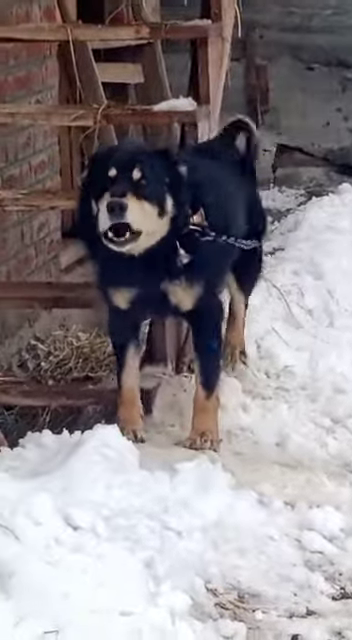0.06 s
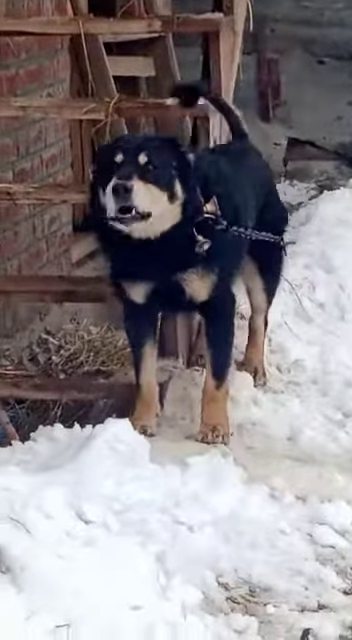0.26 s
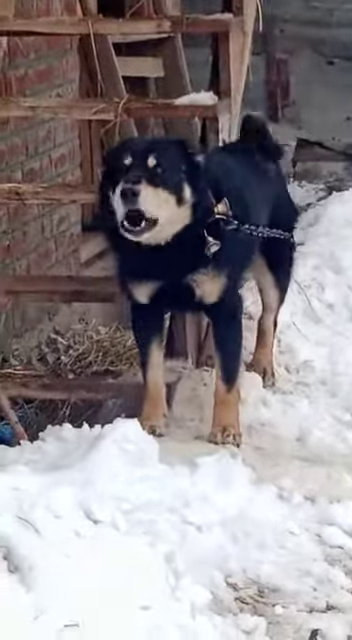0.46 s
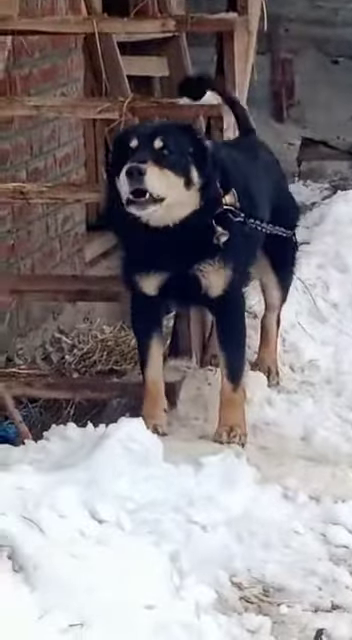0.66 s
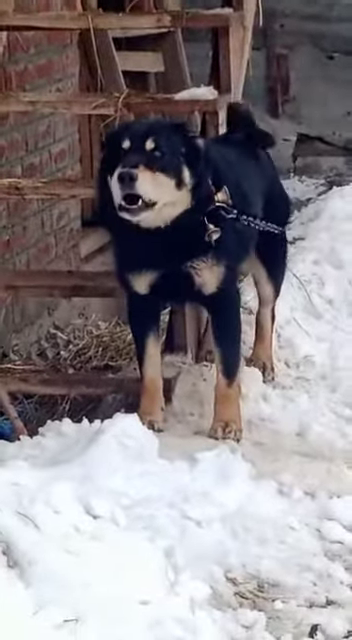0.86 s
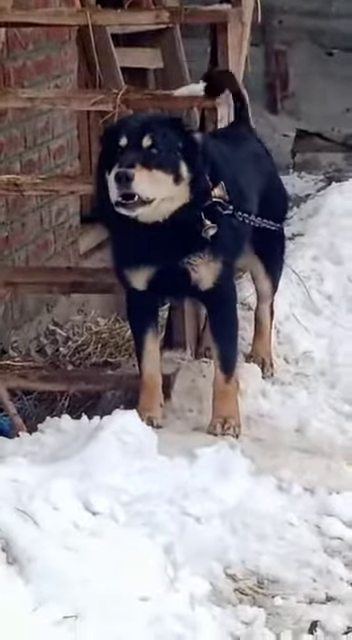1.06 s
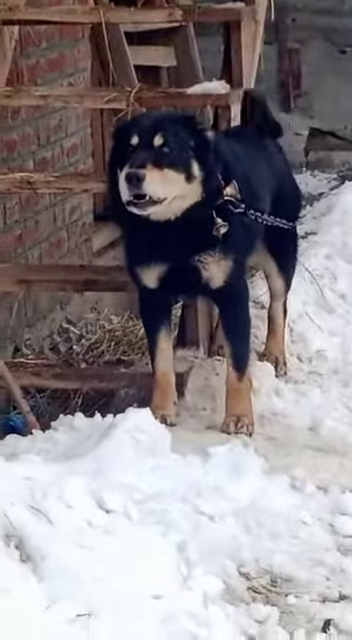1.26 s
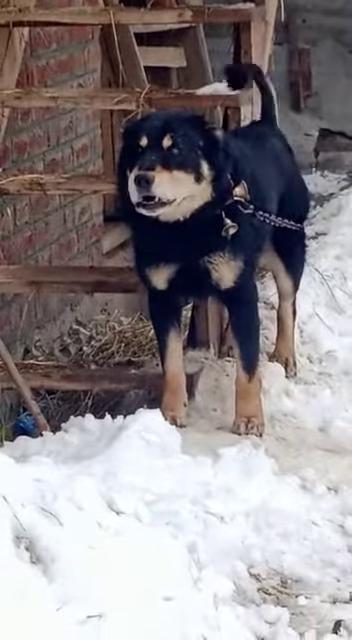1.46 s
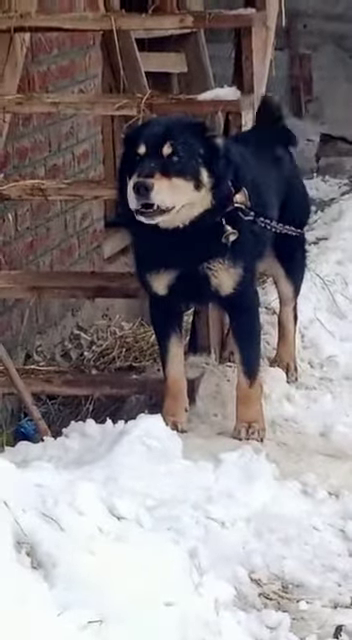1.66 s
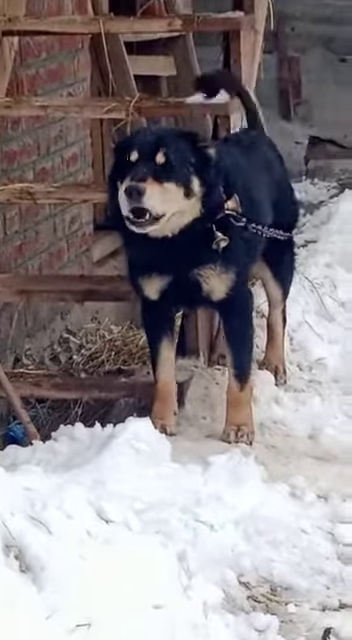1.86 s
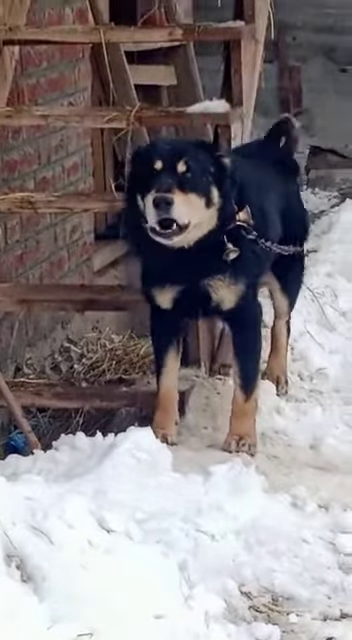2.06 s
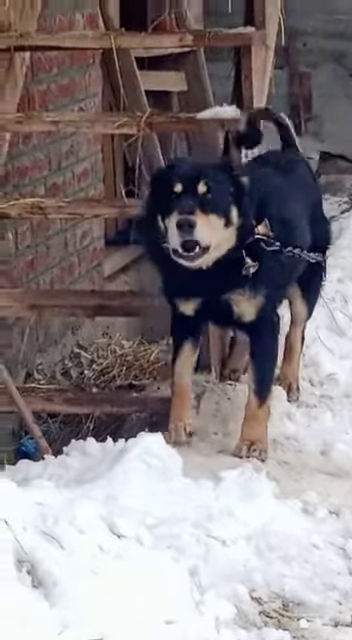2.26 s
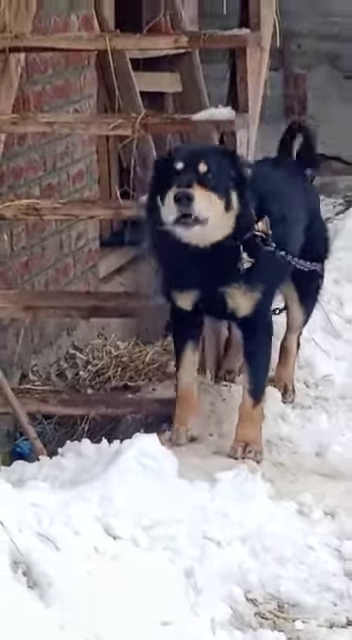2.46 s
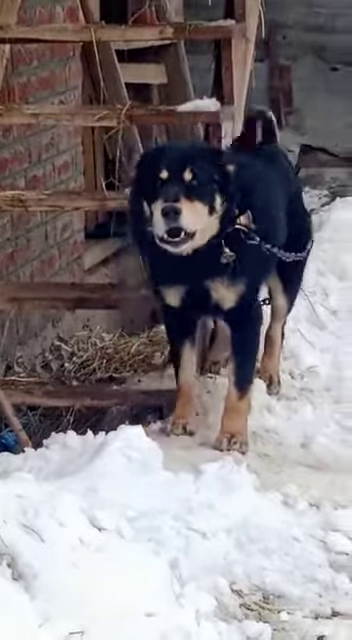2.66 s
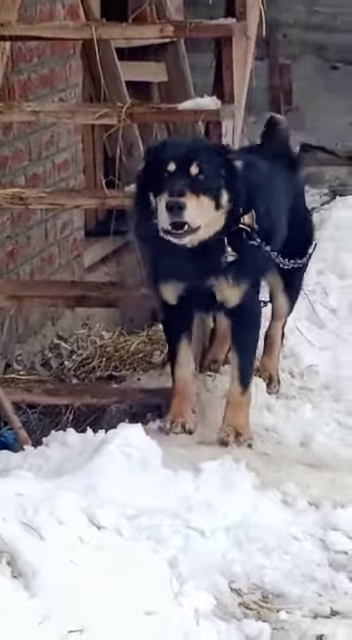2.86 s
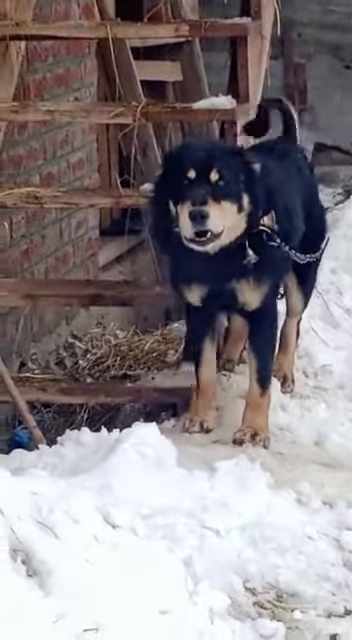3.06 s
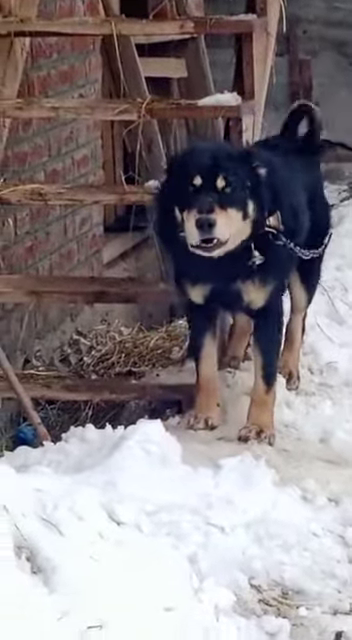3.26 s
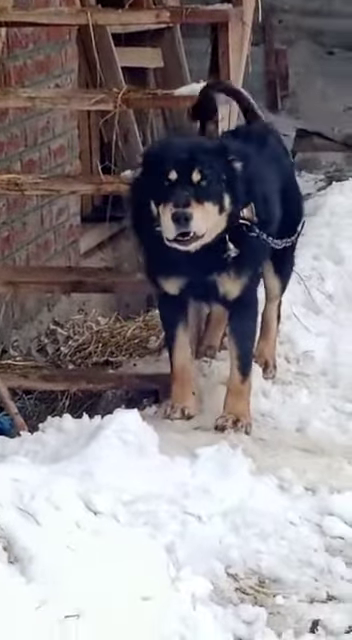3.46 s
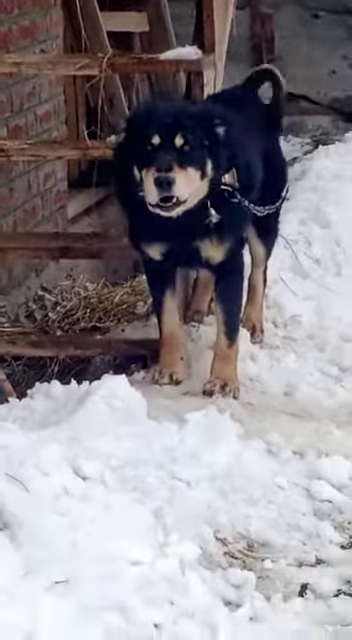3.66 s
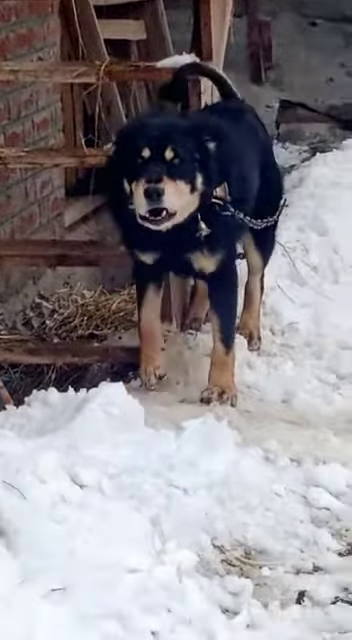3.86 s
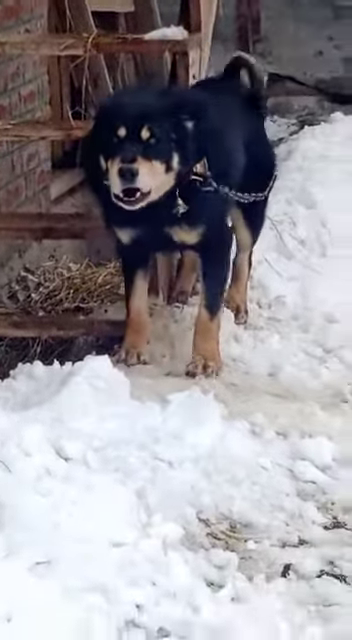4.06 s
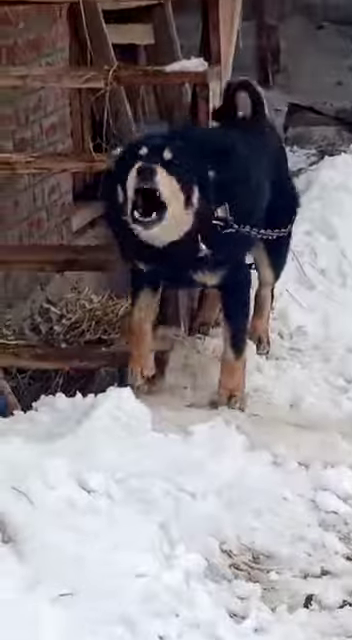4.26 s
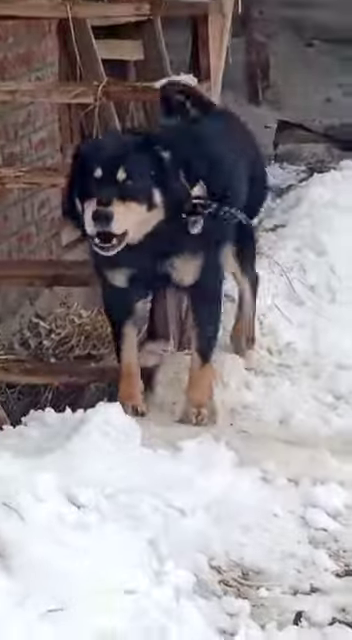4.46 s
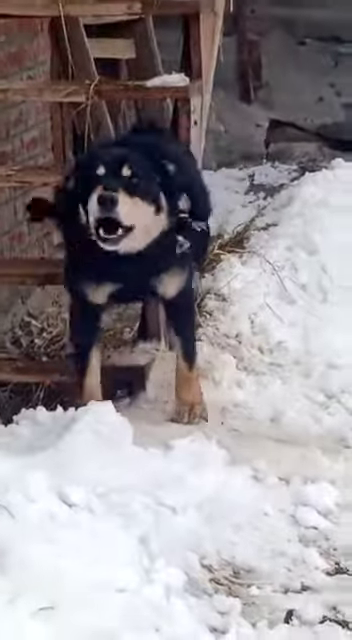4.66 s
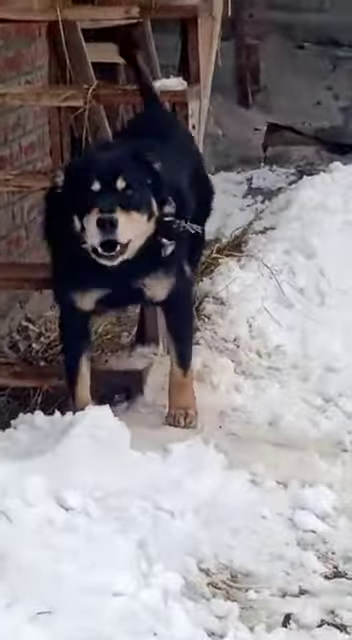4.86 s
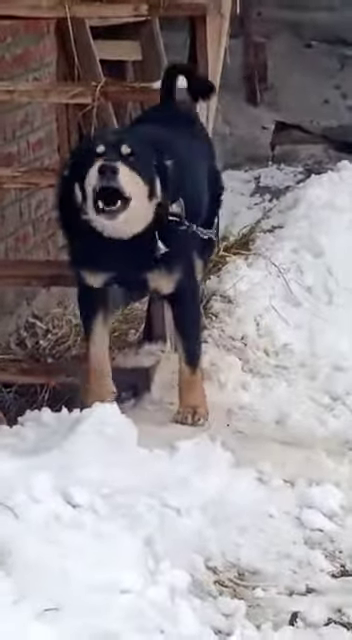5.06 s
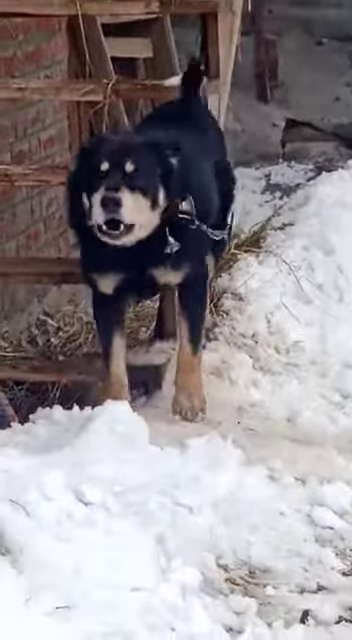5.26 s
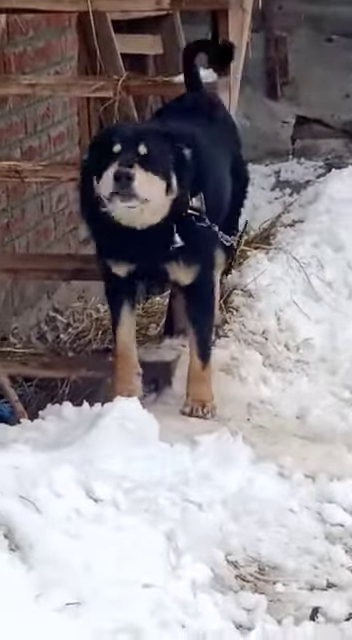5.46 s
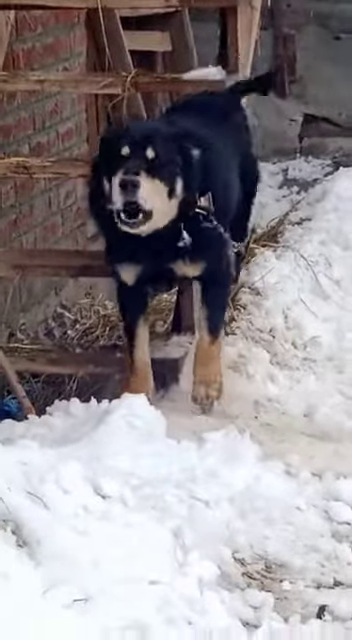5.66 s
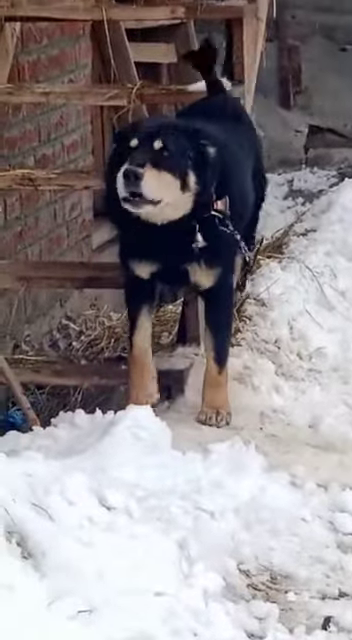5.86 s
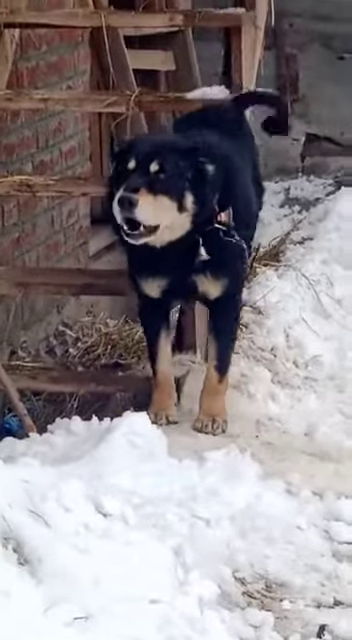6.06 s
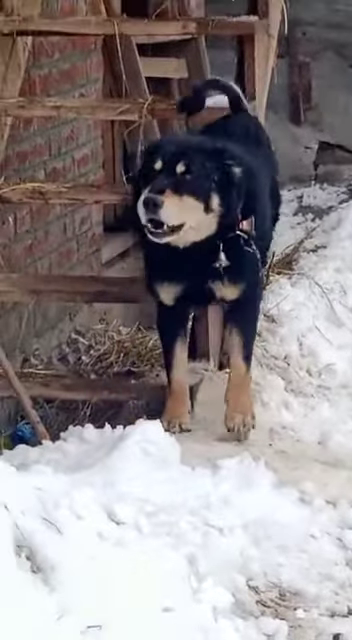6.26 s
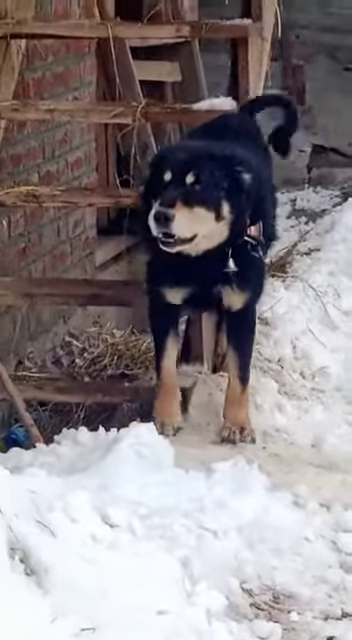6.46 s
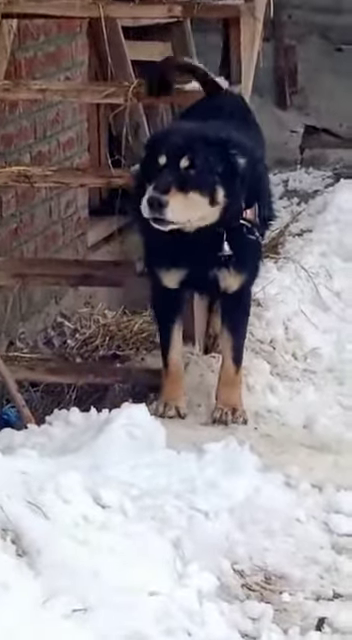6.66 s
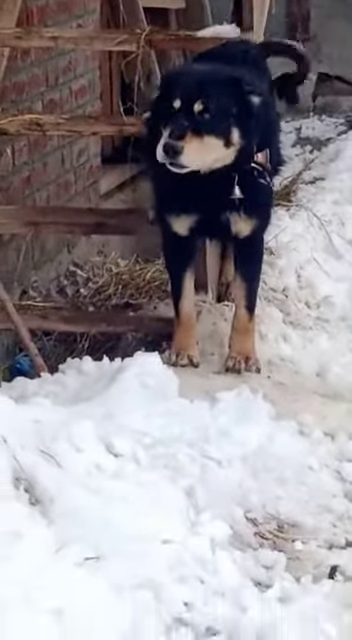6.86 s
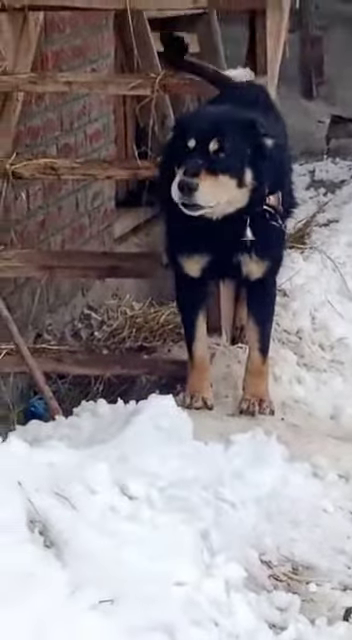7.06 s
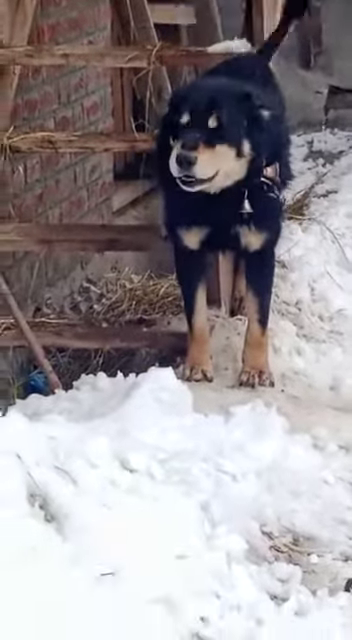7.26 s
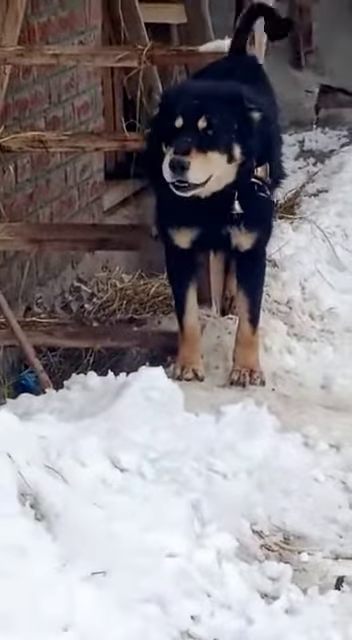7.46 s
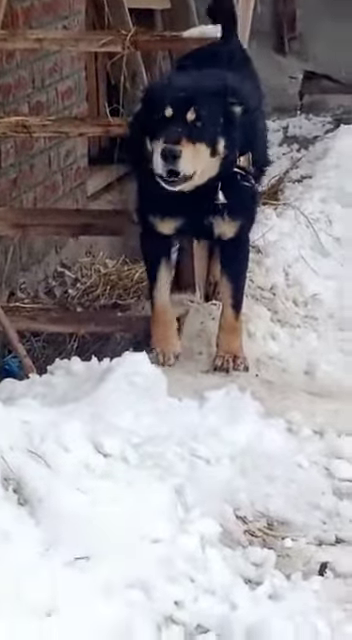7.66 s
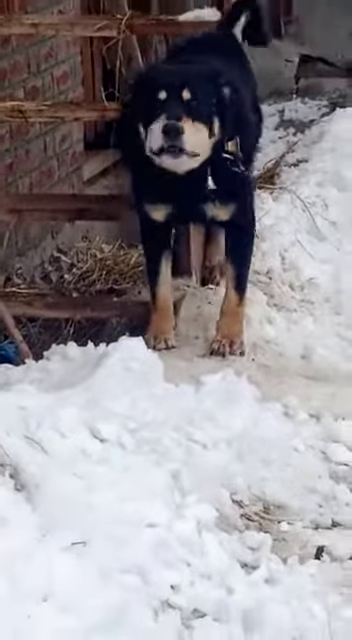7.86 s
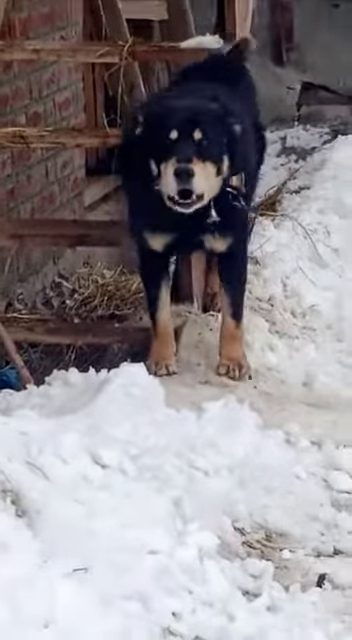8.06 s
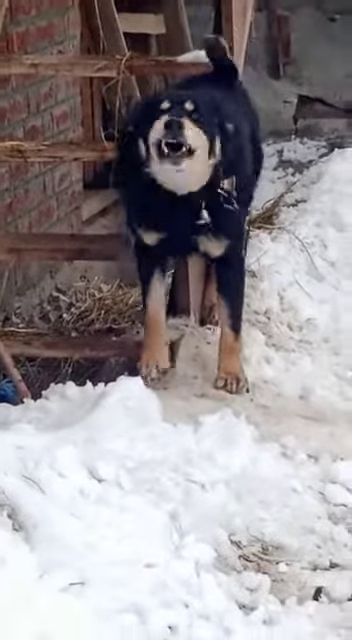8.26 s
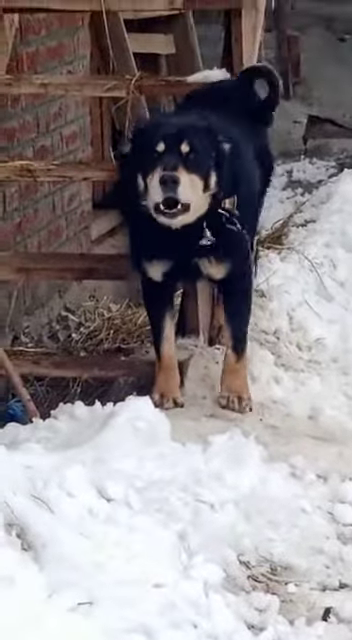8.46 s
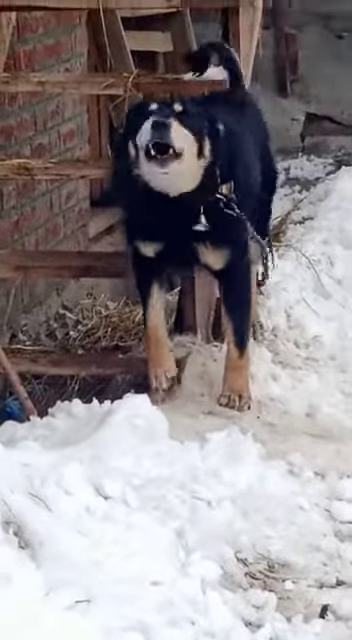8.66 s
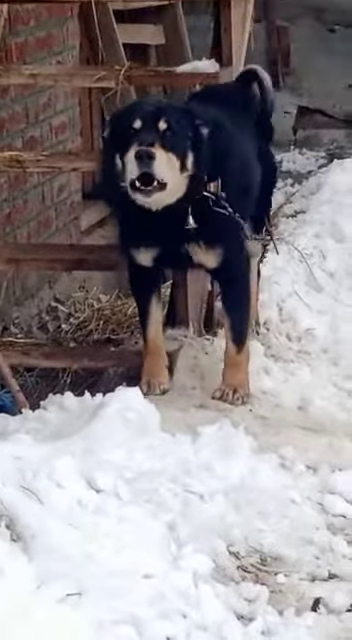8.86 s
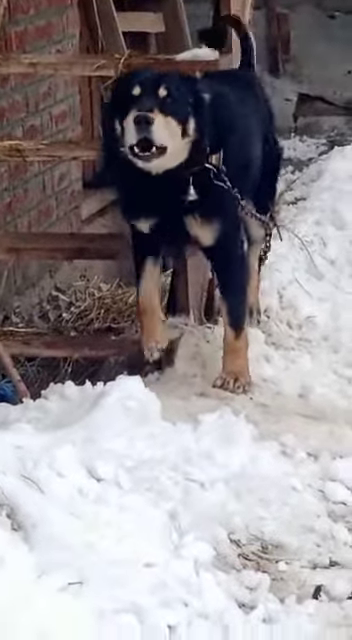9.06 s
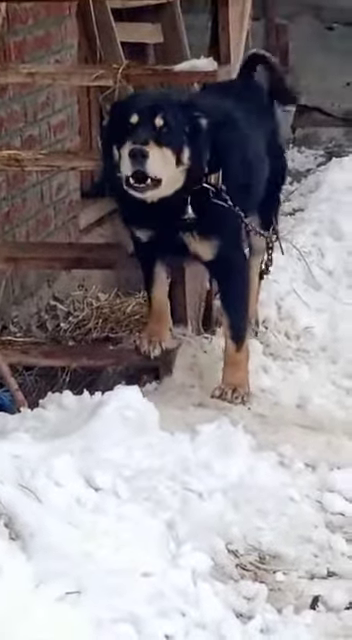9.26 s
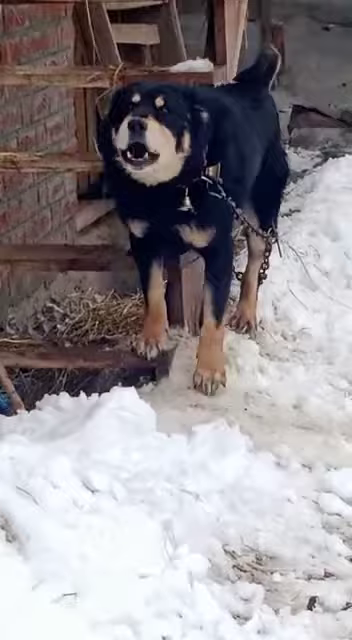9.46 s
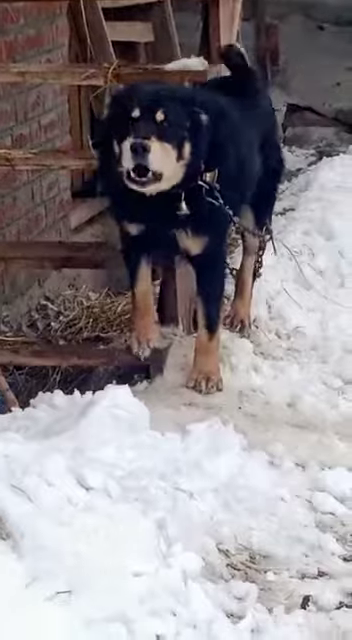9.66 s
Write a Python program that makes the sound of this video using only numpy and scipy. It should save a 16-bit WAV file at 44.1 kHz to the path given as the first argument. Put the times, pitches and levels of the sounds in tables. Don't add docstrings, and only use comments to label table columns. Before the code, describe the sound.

Hoarse, punchy close barks burst out in quick runs outdoors, with breathy panting, low growls, clear howling replies from another dog and jingling tags.

```python
import sys
import numpy as np
from scipy import signal
from scipy.fft import rfft, irfft
from scipy.io import wavfile
from scipy.ndimage import uniform_filter1d

SR = 44100
rng = np.random.default_rng(int(sys.argv[2]) if len(sys.argv) > 2 else 0)


def put_to_file(sound):
    columns = np.atleast_2d(sound).T
    safe = np.clip(columns, -1, 1)
    whole_steps = np.round(safe * 32767)
    wavfile.write(sys.argv[1], SR, whole_steps.astype(np.int16))


def amplitude_ratio(level_db):
    exponent = np.asarray(level_db, float) / 20
    return 10 ** exponent


N = 428651
TIME = np.arange(N) / SR


def rms_one(x):
    return x / np.sqrt(np.mean(x ** 2) + 1e-20)


def noise():
    return rng.standard_normal(N)


def drift(rate_hz):
    r = np.exp(-2 * np.pi * rate_hz / SR)
    return rms_one(signal.lfilter([1], [1, -2 * r, r * r], noise()))


def filtered(x, order, hz, kind):
    return signal.sosfilt(signal.butter(order, hz, kind, fs=SR, output="sos"), x)


def band_one(x, low_hz, high_hz):
    return x / np.std(filtered(x, 4, [low_hz, high_hz], "band"))


def turns(hz):
    return 2 * np.pi * np.cumsum(hz) / SR


def played(calls, extras=None):
    rows = []
    for k, call in enumerate(calls):
        extra = list(extras[k]) if extras else []
        rows += [list(row) + extra for row in call]
    s, *columns = np.transpose(rows)
    gate = 0
    for call in calls:
        inside_s = np.minimum(TIME - call[0][0], call[-1][0] - TIME)
        gate = gate + np.clip(inside_s / .012 + .5, 0, 1)
    return [np.interp(TIME, s, c) for c in columns] + [gate]


def resonate(x, hz, width_hz):
    r = np.exp(-np.pi * width_hz / SR)
    return signal.lfilter([(1 - r * r) / 2, 0, (r * r - 1) / 2], [1, -2 * r * np.cos(2 * np.pi * hz / SR), r * r], x)


def tract(x, modes, patchy_db):
    out = 0
    for k, (hz, width_hz, db) in enumerate(modes):
        flicker = amplitude_ratio(db + patchy_db * drift(13.4))
        out = out + (-1) ** k * flicker * resonate(resonate(x, hz, width_hz), hz, width_hz)
    return out


def swell(hz, centre_hz, width_hz, lift):
    return lift / (1 + ((hz - centre_hz) / width_hz) ** 2)


def struck(times, levels_db, modes, spread_db):
    out = np.zeros(N)
    luck = rng.standard_normal((len(times), len(modes)))
    for k, (hz, db, t60_s) in enumerate(modes):
        clicks = np.full(N, 1e-18)
        clicks[(times * SR).astype(int)] = amplitude_ratio(levels_db + db + spread_db * luck[:, k])
        r, w = amplitude_ratio(-60 / (t60_s * SR)), 2 * np.pi * hz / SR
        out += signal.lfilter([0, np.sin(w)], [1, -2 * r * np.cos(w), r * r], clicks)
    return out


# lag in seconds, share of the direct sound.
BOUNCES = [(.0013, .55), (.0029, -.5), (.0047, .3)]


def bounced(x):
    here = np.arange(N)
    out = x
    for lag_s, share in BOUNCES:
        lag = SR * lag_s * (1 + .03 * drift(2))
        out = out + share * np.interp(here - lag, here, x)
    return out


# frequency in Hz, level in dB.
AIR = [(24, -45), (60, -5), (200, -8), (585, -17), (942, -18), (1240, -14.5), (3140, -24.5), (12500, -35.5),
       (15300, -30)]


def air():
    hz = np.maximum(np.arange(N // 2 + 1) * SR / N, 1)
    points = np.array(AIR)
    colour = amplitude_ratio(np.interp(np.log(hz), np.log(points[:, 0]), points[:, 1]))
    return amplitude_ratio(-77 + 2.5 * drift(3)) * rms_one(irfft(rfft(noise()) * colour, N))


# start in seconds, end in seconds, mouth rush
# in dB, hiss at the teeth in dB.
BREATHS = [(-0.1, 0.086, -59.5, -67.5), (0.326, 0.482, -60, -69.5), (0.67, 0.853, -65, -74.5),
           (0.915, 1.29, -66, -71.5), (1.336, 1.616, -65.5, -74.5), (1.752, 1.882, -65.5, -77),
           (2.08, 2.302, -63.5, -75.5), (2.499, 2.776, -63, -75.5), (2.813, 2.906, -60.5, -69.5),
           (2.886, 3.004, -53.5, -68.5), (2.985, 3.062, -64, -84), (3.086, 3.296, -73.5, -84.5),
           (3.348, 3.775, -65, -81), (3.568, 3.801, -94, -94), (3.925, 4.203, -63, -72),
           (4.408, 4.577, -57.5, -69), (4.782, 4.961, -63, -58), (5.185, 5.334, -56.5, -70),
           (5.48, 5.691, -57, -72), (5.879, 6.2, -58.5, -70.5), (6.329, 6.415, -72.5, -83),
           (6.691, 6.942, -71, -82.5), (6.78, 6.795, -90, -84), (6.993, 7.027, -89, -77),
           (7.137, 7.298, -71.5, -86), (7.158, 7.545, -68.5, -91), (7.5, 7.696, -70, -84.5),
           (7.902, 8.153, -62.5, -74), (8.38, 8.554, -59.5, -71), (8.75, 8.916, -61, -73.5),
           (9.145, 9.349, -57, -73.5), (9.557, 9.731, -61.5, -74.5)]
# frequency in Hz, width in Hz, level in dB.
PANT_LOW = [(550, 194, -0.5), (1196, 244, 7.5), (1796, 347, 4), (2020, 1200, -8.5), (2475, 440, -10)]
# frequency in Hz, width in Hz, level in dB.
PANT_HIGH = [(3900, 1200, -19.5), (5110, 460, -3.5), (6200, 930, -5.5), (10540, 4000, -38),
             (15130, 2500, -18.5)]
# frequency in Hz, width in Hz, level in dB.
TEETH = [(3370, 270, 0.5), (4190, 220, -5)]


def panting(slaps, depth):
    lean = 1.08
    low, high = np.zeros(N), np.zeros(N)
    for start, end, low_db, high_db in BREATHS:
        span = (TIME > start) & (TIME < end)
        arch = np.sin(np.pi * ((TIME[span] - start) / (end - start)) ** lean) ** 0.68
        low[span] += amplitude_ratio(low_db) * arch
        high[span] += amplitude_ratio(high_db) * arch
    rush = band_one(bounced(tract(noise() * slaps, PANT_LOW, 3)), 1000, 2600)
    hiss = band_one(bounced(tract(noise() * slaps, PANT_HIGH, 3)), 4500, 7000)
    whistle = (1 - depth) ** 2 * tract(rms_one(hiss) + 3 * noise(), TEETH, 4)
    return low * rush + high * (hiss + whistle)


# time in seconds, then top, middle and low modes in dB.
TAGS = [(0.002, -72, -78, -66), (0.4444, -68, -74, -67), (4.337, -52, -68, -62), (4.4764, -56, -68, -59),
        (4.485, -47, -59, -62), (4.5161, -52, -63, -62), (4.5805, -54, -57, -59), (4.745, -72, -76, -64),
        (4.793, -74, -74, -70), (4.8459, -52, -64, -60), (4.9641, -58, -68, -71), (5.2779, -61, -68, -64),
        (5.49, -72, -74, -70), (5.695, -50, -65, -59), (5.9883, -59, -82, -61), (6.104, -64, -80, -91),
        (6.4502, -60, -68, -75), (6.465, -52, -62, -58), (7.7288, -60, -64, -59), (7.9219, -64, -71, -73),
        (7.9474, -67, -70, -70), (7.9778, -58, -71, -82), (8.094, -52, -69, -77), (8.1618, -55, -66, -71),
        (8.5061, -58, -61, -66), (8.586, -56, -68, -66), (8.75, -68, -70, -66), (8.8463, -68, -68, -72),
        (9.2, -74, -76, -76), (9.3636, -56, -65, -64), (9.5417, -67, -73, -63), (9.652, -66, -76, -78)]
# frequency in Hz, level in dB, t60 in seconds.
TAG_MODES = [
    [(15650, -2, .17), (14590, -7, .15), (14480, -13, .2)],
    [(10420, -3, .2), (10200, -8, .2), (9135, -5, .22)],
    [(7472, -3, .5), (7512, -6, .35)],
]
# time in seconds, then low, middle, top and long ring in dB.
LINKS = [(0.004, -64, -72, -69, -74), (0.3684, -72.5, -63, -69, -69), (1.042, -76, -74, -73.5, -63.5),
         (1.509, -57, -63, -66, -62), (5.185, -73, -79, -78, -79), (6.1365, -76.5, -74, -72, -66),
         (6.33, -73, -73, -87, -89), (6.487, -71.5, -64, -60.5, -69), (6.53, -61, -95, -100, -86),
         (6.759, -83, -84, -84.5, -80), (6.846, -78.5, -80.5, -75, -61.5), (7.15, -89, -81, -88, -77)]
# frequency in Hz, level in dB, t60 in seconds.
LINK_MODES = [
    [(2705, 0, .8)],
    [(5030, -2, .2), (4930, -5, .15)],
    [(8730, -1, .25), (12800, -7, .12)],
    [(5740, -1, .4), (5900, -9, .25)],
]
# time in seconds, level in dB, frequency in Hz, t60 in seconds.
PINGS = [
    (5.49, -64, 9140, 0.11),
    (5.68, -77, 13400, 0.085),
    (5.682, -77, 12850, .1),
    (5.865, -64, 9030, 0.14),
    (6.119, -82, 9050, .12),
    (6.14, -76, 13900, .1),
    (6.45, -59, 9090, .12),
    (6.468, -72, 2910, 0.54),
    (6.758, -80, 9100, 0.17),
    (7.095, -85, 9010, 0.1),
]


def metal():
    s, *groups_db = np.transpose(TAGS)
    tags = sum(struck(s, db - 2, modes, spread_db=2) for db, modes in zip(groups_db, TAG_MODES))
    tick_modes = [(5500, -4, .004), (9500, 0, .004), (12800, 2, .004)]
    tick = struck(s, groups_db[1] - 7, tick_modes, spread_db=2)
    s, *groups_db = np.transpose(LINKS)
    links = 0
    for db, modes in zip(groups_db, LINK_MODES):
        for mode in modes:
            ring = struck(s, db, [mode], spread_db=2)
            links = links + amplitude_ratio(2.9 * drift(25)) * resonate(ring, mode[0], 160)
    pings = sum(struck(np.array([s]), db, [(hz, 0, t60_s)], spread_db=0) for s, db, hz, t60_s in PINGS)
    return tags + tick + links + pings


PITCH_SAG = [.48, .28, .005, .01, .08, .46]
THROAT_GLIDE = [.93, .97, 1.05, 1.12]


def bark_shape(start, length, top_hz, arch, effort_db, burst_db, folds_db, throat_db, climax, hold, sink_db,
               folds_catch_db, throat_catch_db, burst, catch, climb):
    lead, surge, shut = 0.0536, 0.06224, 0.056
    fall_after = .11
    climax = np.clip(climax, catch + surge + .01, .7)
    hold = np.clip(hold, climax + .03, .95 - fall_after)
    fall = hold + fall_after
    main = [0, burst, catch, climax, hold, fall, 1]
    at = np.array([0, burst - lead, burst, catch, catch + surge, climax, hold, hold + shut, fall, 1])
    opening, closing = effort_db - 25.5, effort_db - 23
    folds = [opening, burst_db - 14, effort_db + folds_catch_db, folds_db, folds_db + 1.5, effort_db - 8.5, closing]
    held = throat_db + sink_db
    dropped = held - 10
    throat = [opening, burst_db - 5, burst_db, effort_db + throat_catch_db, throat_db - 3.5, throat_db, held,
              dropped, min(dropped, throat_db - 18), closing]
    rasp = effort_db + np.array([-25.5, -4.5, -0.5, 0, 0, -4.5, -25])
    sag = arch * np.interp(at, main, PITCH_SAG[:2] + [climb] + PITCH_SAG[2:])
    unsettled = .35 * sag
    glide = 1 + arch * (np.array(THROAT_GLIDE + [1] * 6) - 1)
    loose = 1 - arch * (1 - .3) * (at <= burst)
    return np.transpose([start + length * at, top_hz * (1 - sag), np.interp(at, main, folds), throat,
                         np.interp(at, main, rasp), unsettled, glide, loose])


# level in dB, share of the mouth opening from 0 to 1.
PARTIALS = [(-3.5, 0.6), (5, 0.17), (-1, 0.5), (-15.5, 0.8), (-40, 0.73), (-31.5, 0.98), (-19.5, 0.4)]


def fold_buzz(hz, phase, rough, throat_hz, mouth_db):
    folds = 0
    for k, (db, share) in enumerate(PARTIALS):
        partial_hz = (k + 1) * hz
        throat_gain = (1 + swell(partial_hz, throat_hz, 46, lift=2.1)) * np.minimum(partial_hz / 380, 1) ** 2
        folds = folds + amplitude_ratio(db + share * mouth_db) * throat_gain * np.cos((k + 1) * phase)
    shimmer = 1 + 1.74 * rough * drift(120)
    return shimmer * folds


def throat_tone(throat_hz, throat_rough, octave_db):
    swing = turns(throat_hz * (1 + 0.0126 * drift(27.7)))
    wobble = (drift(69) * np.cos(swing) + drift(82) * np.sin(swing)) / np.sqrt(2)
    octave = amplitude_ratio(octave_db + 3.0 * drift(60)) * np.cos(2 * swing)
    clear = np.cos(swing) + octave
    return np.sqrt(1 - throat_rough) * clear + np.sqrt(throat_rough) * wobble


# frequency in Hz, width in Hz, level in dB.
MOUTH = [(700, 53, 11), (1125, 379, 15), (1607, 500, -3), (1900, 990, 4.5), (2800, 250, -6.5),
         (4170, 930, 0.5), (5695, 870, 3), (6530, 1100, -3), (7084, 830, -7.5), (9100, 1700, -16),
         (11170, 1500, -23), (15200, 2500, -13.5)]


def bark_rasp(phase, rough, low_db, top_db):
    puffs = noise() * (1 + .5 * np.cos(phase)) * amplitude_ratio(drift(40))
    snaps = np.diff(np.floor(phase / (2 * np.pi)), prepend=0) * (1 - rough)
    puffs = puffs + 5.0 * filtered(snaps, 2 * 2, 1700, "high")
    rasp = band_one(bounced(tract(puffs, MOUTH, 3)), 1800, 8000)
    low = signal.sosfiltfilt(signal.butter(2, 1700, fs=SR, output="sos"), rasp)
    top = signal.sosfiltfilt(signal.butter(2, 7600, "high", fs=SR, output="sos"), rasp)
    return rasp + (amplitude_ratio(low_db) - 1) * low + (amplitude_ratio(top_db + 2.0 * drift(33)) - 1) * top


# start in seconds, length in seconds, top pitch in Hz, pitch arch from 0 to 1,
# effort as rasp level in dB.
BARKS = [(0.085, 0.2, 413.8, 0.95, -37.5), (0.489, 0.19, 399, 1, -38), (1.89, 0.15, 250.2, 0.92, -46.5),
         (2.328, 0.19, 391.1, 0.93, -39), (3.66, 0.26, 281.1, 0.06, -55), (4.217, 0.18, 403.1, 1, -37.5),
         (4.571, 0.17, 383.1, 0.99, -37.5), (4.981, 0.17, 394.5, 0.98, -37), (5.342, 0.2, 366.4, 1, -38.5),
         (5.693, 0.18, 350.5, 0.92, -37), (7.717, .18, 351, 0.95, -42), (8.173, 0.19, 387.1, 0.99, -40.5),
         (8.569, .18, 385.3, 0.96, -36.5), (8.918, 0.18, 372.9, 1, -40), (9.351, 0.18, 389.8, 0.94, -39.5)]
# first burst in dB, folds at the climax in dB, throat tone at the climax in dB.
STRESS = [(-30, -27.5, -29), (-32, -35.5, -39.5), (-35, -71, -33.5), (-32, -33, -32), (-56, -57, -43.5),
          (-33, -31, -25.5), (-39, -37.5, -29), (-24, -35, -21), (-25, -31.5, -20), (-26.5, -56, -18),
          (-32.5, -50.5, -20.5), (-27.5, -30.5, -25), (-25, -28, -18.5), (-25, -31.5, -33.5),
          (-28, -28.5, -33)]
# climax and hold end as shares of length, throat sink through the hold in dB.
PACE = [(0.52, .68, -8), (0.475, 0.68, 0.5), (0.45, .66, -18.5), (0.5, .66, -6.5), (0.49, 0.8, 6),
        (0.52, 0.6, -2.5), (0.5, .68, 2), (0.55, 0.67, 2), (.54, 0.62, 0), (0.55, .68, -7), (.55, .67, 3.5),
        (0.5, .6, -3.5), (0.52, .58, -8.5), (0.507, 0.659, -2.5), (0.49, 0.67, -10)]
# folds in dB, throat tone in dB.
CATCHES = [(-4.5, 9), (-1.5, 1), (-5, 12.5), (4.5, -9), (-13, 5), (0, -7), (1.5, 0), (1, 0.5), (2, 4.5),
           (4.5, -2), (5.5, 4), (-0.5, 4), (1, -6), (7.5, -7), (3, 7)]
LAUNCH = [(.23, .36, .12), (.23, .32, .14), (.3, .39, .1), (.21, .4, .06), (.32, .43, 0.11), (.17, .4, .06),
          (.2, .36, .08), (.21, .34, .04), (.21, .42, .01), (0.19, 0.4, .04), (.2, .33, .08),
          (.19, .31, .1), (.2, .4, .06), (.22, .33, .11), (.22, .37, .12)]
# throat tone in Hz, mouth opening on the upper partials in dB.
SHAPES = [(562.6, 4), (535, 7), (542.6, -5), (579.3, 7), (575, -36), (513.3, 7.5), (539.8, -18),
          (525, -2.5), (530, -1), (522.3, -12), (518.8, -2), (541, 5), (520, -2), (560, -4.5), (557, -1.5)]
ROUGH = [(.9, .1), (.9, .12), (.6, .5), (.85, .1), (.55, 1), (.15, .2), (.7, .4), (.12, .2), (.2, .25),
         (.1, .3), (.08, .45), (.15, .12), (.15, .2), (.8, .15), (.9, .15)]
# below the second resonance in dB, above the teeth in dB.
RASP_TILT = [(-5.5, 0.5), (-3.5, 0), (5.5, -3), (1, -3), (3.5, 4.5), (-3, -2), (-3.5, 3), (-3, 2.5),
             (2.5, 0.5), (-2.5, -5), (5, 0.5), (7, 2), (-3.5, -0.5), (-0.5, -3), (0.5, 0)]
THROAT_OCTAVE_DB = [-17.5, -10.5, -12, -20, -20, -17, -16, -22, -25, -15, -17.5, -15, -18.5, -10, -11]


def near_dog():
    barks = [bark_shape(*sum(rows, ())) for rows in zip(BARKS, STRESS, PACE, CATCHES, LAUNCH)]
    extras = [shape + rough + tilt + (octave_db,)
              for shape, rough, tilt, octave_db in zip(SHAPES, ROUGH, RASP_TILT, THROAT_OCTAVE_DB)]
    (hz, folds_db, throat_db, rasp_db, unsettled, glide, loose,
     throat_hz, mouth_db, throat_rough, rough, low_db, top_db, octave_db, gate) = played(barks, extras)
    rough = np.minimum(rough + unsettled, 1)
    hz = uniform_filter1d(hz, size=500)
    phase = turns(hz * (1 + .05 * rough * drift(72.6)))
    folds = fold_buzz(hz, phase, rough, throat_hz, mouth_db)
    throat = throat_tone(throat_hz * glide, throat_rough * loose, octave_db)
    rasp = bark_rasp(phase, rough, low_db, top_db)
    voice = np.sqrt(2) * (amplitude_ratio(folds_db - 4.5) * folds + amplitude_ratio(throat_db + 1.0) * throat)
    voice = filtered(gate * voice + 1e-18, 2, 250, "high")
    chest = rms_one(filtered(noise(), 2, [70, 190], "band"))
    return voice + gate * amplitude_ratio(rasp_db) * (rasp + amplitude_ratio(-29) * chest)


def growl_shape(start, length, start_hz, top_hz, level_db):
    return [(start, start_hz, level_db - 9.5), (start + 0.62 * length, top_hz, level_db),
            (start + length, top_hz * (1 - 0.079), level_db - 9)]


# start in seconds, length in seconds, start pitch in Hz, top pitch in Hz, level in dB.
GROWLS = [
    (0.458, .3, 98, 90.4, -71.5),
    (0.93, 0.69, 74, 88.2, -66.5),
    (1.902, 0.11, 104.5, 120.3, -66.5),
    (2.352, 0.48, 92.47, 85, -77),
    (2.835, .13, 94.9, 90.9, -69),
    (3.163, 0.12, 72.24, 70.4, -83.5),
    (3.333, 0.59, 78.23, 111.3, -65),
    (4.454, .5, 102.2, 98.3, -74),
    (6.837, 0.45, 94.2, 88.9, -77.5),
    (8.72, 0.46, 87.8, 93.04, -75),
]
GROWL_DB = [2.5, -1.5, -4.5, -18.5, -11.5, -17, -14.5]
GROWL_OCTAVE_DB = [2.5, -5, 10, -8, 2, 0, 1, 0.5, -3, -3.5]
GROWL_RATTLE_DB = [-6, 5.5, -11, -14, 7, -15.5, 2.5, -14, -3.5, -1]
# frequency in Hz, width in Hz, level in dB.
RATTLE = [(580, 150, 2.5), (840, 170, 0.5), (1250, 220, -3), (1760, 250, -7), (2260, 220, -3.5),
          (5700, 800, -17)]


def growl():
    growls = [growl_shape(*row) for row in GROWLS]
    hz, level_db, octave_db, rattle_db, gate = played(growls, list(zip(GROWL_OCTAVE_DB, GROWL_RATTLE_DB)))
    phase = turns(hz * (1 + 0.011 * drift(23)))
    hum = 0
    for k, db in enumerate(GROWL_DB):
        partial_db = db + (k == 1) * octave_db + 2 * drift(28)
        hum = hum - amplitude_ratio(partial_db) * np.cos((k + 1) * phase)
    cycle = phase / (2 * np.pi) % 1
    puff = np.exp(-5 * cycle) * amplitude_ratio(2.5 * drift(50))
    rattle = rms_one(tract(noise() * puff, RATTLE, 2))
    voice = gate * amplitude_ratio(level_db) * (np.sqrt(2) * hum + amplitude_ratio(rattle_db) * rattle)
    depth = gate * np.clip((level_db + 84) / 16, 0, .8)
    slaps = 1 - depth + 3 * depth * puff
    return voice, slaps, depth


# share of top pitch, level in dB, overtones in dB, third partial in dB.
ANSWER_ARCH = [
    (0.34, -20.5, -25, -12),
    (.72, -17, -1.5, -10),
    (.97, -2.5, -2.5, 11.5),
    (1.01, 1, 3.5, -7),
    (1.0, -2, -6, -14),
    (0.92, -13, -1.5, -3.5),
    (0.4, -31.5, -16, -10),
]


def answer_shape(start, length, top_hz, level_db, crest, crest_end, over_db, third_db, rasp_db):
    fall = crest_end + 0.41 * (1 - crest_end)
    moments = [0, 0.64 * crest, crest, (crest + crest_end) / 2, crest_end, fall, 1]
    return [(start + length * at, top_hz * share, level_db + db, level_db + over_db + o_db, third_db + t_db,
             rasp_db + 0.3 * db, abs(1 - share))
            for at, (share, db, o_db, t_db) in zip(moments, ANSWER_ARCH)]


# start in seconds, length in seconds, top pitch in Hz, level in dB.
ANSWERS = [
    (0.743, 0.23, 484.3, -33.5),
    (1.202, 0.18, 485.7, -31),
    (1.59, .19, 500, -30.5),
    (4.867, .22, 454.3, -36.5),
    (5.771, .19, 502, -29.5),
    (6.156, 0.18, 500, -29.5),
    (6.525, 0.18, 488, -31.5),
]
# crest begin and end as shares of length, overtones in dB, third partial in dB,
# rasp in dB.
ANSWER_COLOUR = [(0.33, 0.65, -21.5, 2, -55), (.32, .7, -19, -1.5, -51.5), (.36, .68, -20, -3, -53),
                 (.36, 0.93, -22, -9.5, -53), (0.28, .76, -17, -2.5, -47.5), (.32, .74, -19.5, 0.5, -47),
                 (.32, .66, -20.5, -3, -52)]
# frequency in Hz, width in Hz, level in dB.
ANSWER_MOUTH = [(540, 100, 9), (890, 160, -1.5), (1290, 120, -7), (2000, 150, -23), (2480, 110, -13.5),
                (2740, 120, -17)]
# frequency in Hz, width in Hz, level in dB.
ANSWER_RASP = [(500, 980, 0), (940, 1430, -7), (1520, 3000, -16.5), (2760, 320, -10.5), (5300, 1000, -14.5)]


def far_dog():
    answers = [answer_shape(*row, *colour) for row, colour in zip(ANSWERS, ANSWER_COLOUR)]
    hz, first_db, over_db, third_db, rasp_db, sag, gate = played(answers)
    hz = uniform_filter1d(hz, size=400)
    phase = turns(hz * (1 + 0.012 * drift(42) + .2 * sag * drift(70)))
    first = amplitude_ratio(first_db + 1.0 * drift(57)) * np.minimum(hz / 400, 1) * np.cos(phase)
    upper = swell(3 * hz, 1470, 40, lift=1.14) * amplitude_ratio(third_db + 2.6 * drift(25)) * np.cos(3 * phase)
    for k in range(2, 7):
        mouth = sum(swell(k * hz, centre_hz, width_hz, amplitude_ratio(db)) for centre_hz, width_hz, db in ANSWER_MOUTH)
        upper = upper + mouth * amplitude_ratio(4 * drift(45)) * np.cos(k * phase)
    puffs = noise() * (1 + 0.62 * np.cos(phase))
    rasp = amplitude_ratio(rasp_db) * rms_one(tract(puffs, ANSWER_RASP, 3))
    rasp = filtered(rasp, 6, 6800, "low")
    return gate * (np.sqrt(2) * (first + amplitude_ratio(over_db) * upper) + rasp)


# time in seconds, level in dB.
THUMPS = [(3.25, -83.5), (5.063, -63), (5.177, -49), (5.25, -49), (5.624, -53), (5.659, -67), (5.904, -41),
          (5.944, -53), (6.08, -49), (6.704, -45), (6.76, -49), (7.015, -52), (7.041, -64), (7.156, -57),
          (7.181, -56), (7.358, -55), (7.555, -61)]


def thumps():
    s, db = np.transpose(THUMPS)
    blows = struck(s, db - 5, [(150, -4, .11), (200, -2, .12), (265, -4, .08)], spread_db=2)
    return filtered(blows, 2, [110, 330], "band")


def yard(x):
    t60_s, tail_db, wall_s, wall_db = 0.35, -12.5, .075, -39.5
    t = TIME[:SR]
    tail = rng.standard_normal(SR) * amplitude_ratio(-60 * t / t60_s) * np.clip(t / 0.0074, 0, 1)
    tail = amplitude_ratio(tail_db) * tail / np.sqrt(np.sum(tail ** 2))
    tail[int(wall_s * SR)] += amplitude_ratio(wall_db)
    dull = filtered(x, 2, [280, 3500], "band")
    return signal.fftconvolve(dull, tail)[:N]


def scene():
    near, far = near_dog(), far_dog()
    hum, slaps, depth = growl()
    breath = panting(slaps, depth)
    small = hum + breath + metal() + thumps()
    echo = yard(near + amplitude_ratio(3.5) * far + amplitude_ratio(1.5) * breath)
    return (near + far + echo + small + air())[None]


def low_pass(x):
    return signal.sosfilt(signal.butter(12, 16990, fs=SR, output="sos"), x)


def record(dry):
    thin = filtered(dry, 4, 62, "high")
    mix = signal.sosfilt(signal.cheby2(16, 50, 16080, fs=SR, output="sos"), thin)
    return low_pass(mix)


dry = scene()
out = record(dry)
put_to_file(out)
```